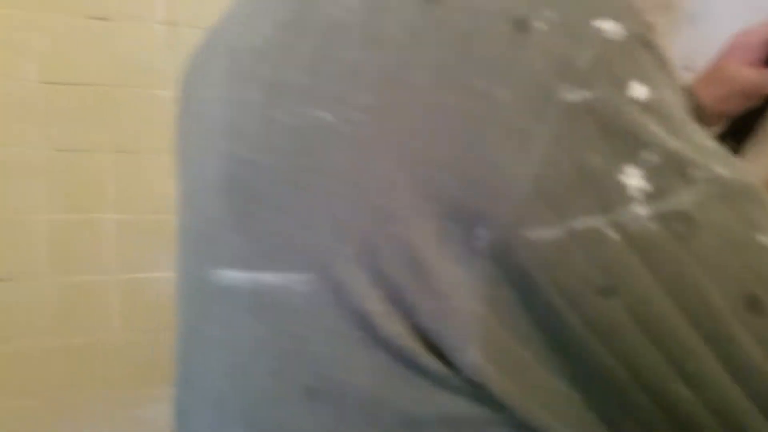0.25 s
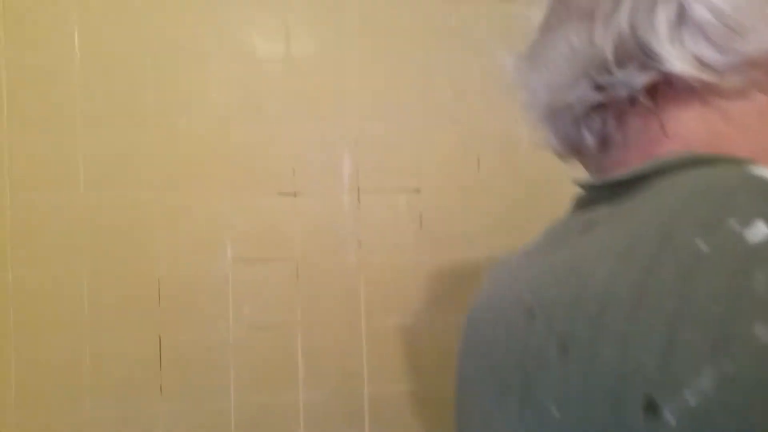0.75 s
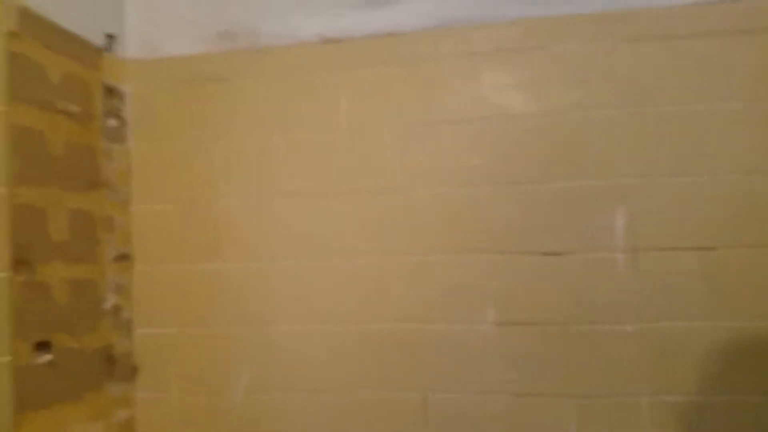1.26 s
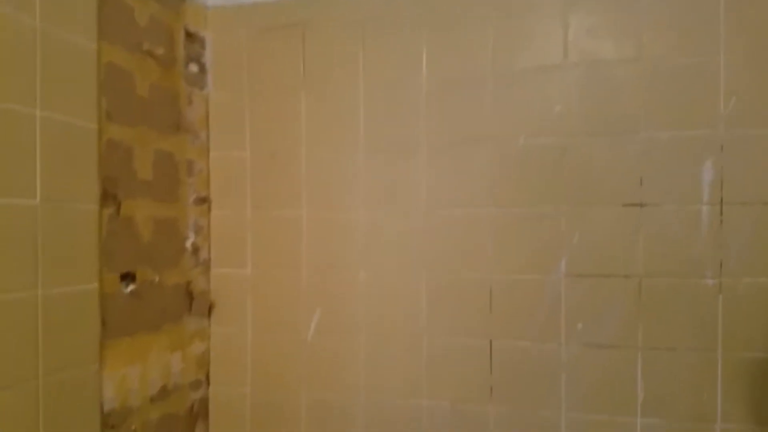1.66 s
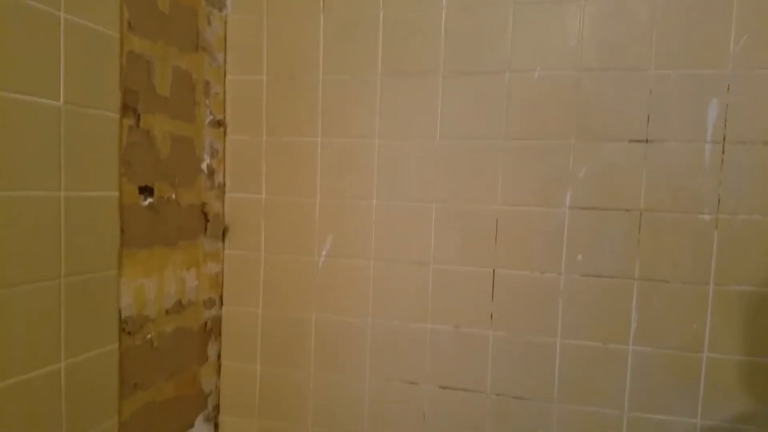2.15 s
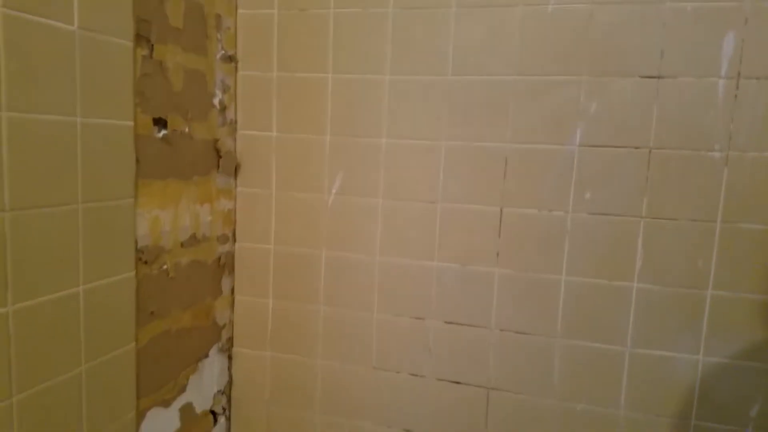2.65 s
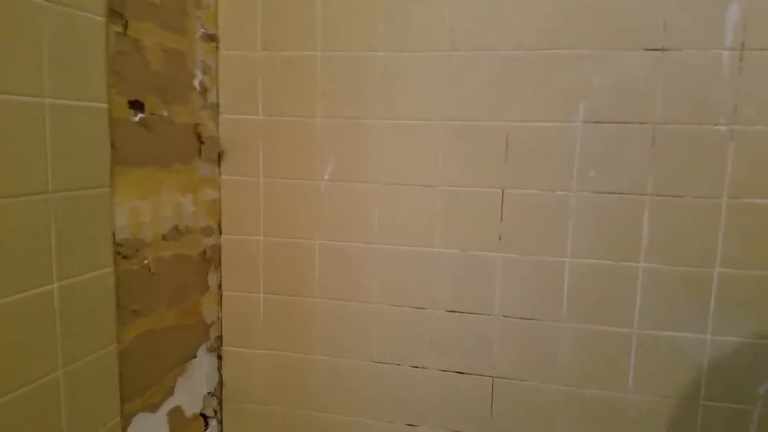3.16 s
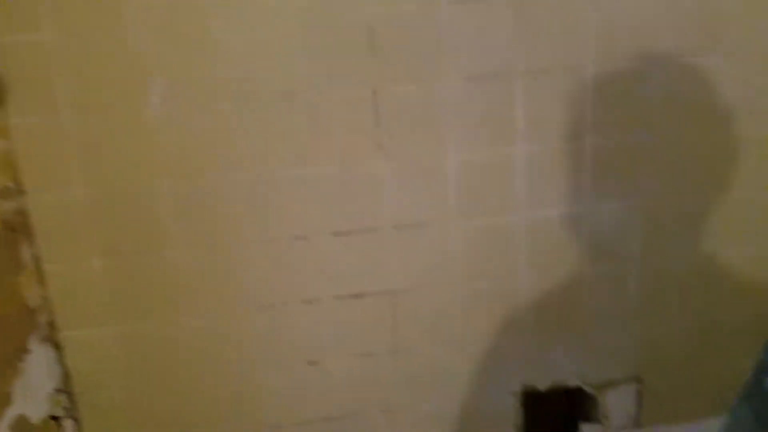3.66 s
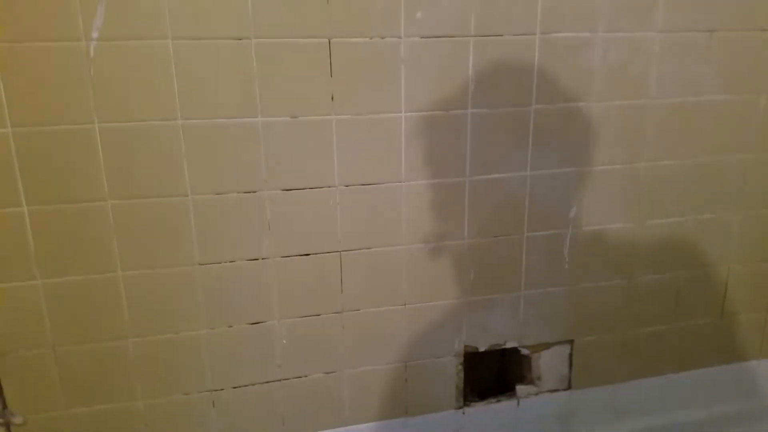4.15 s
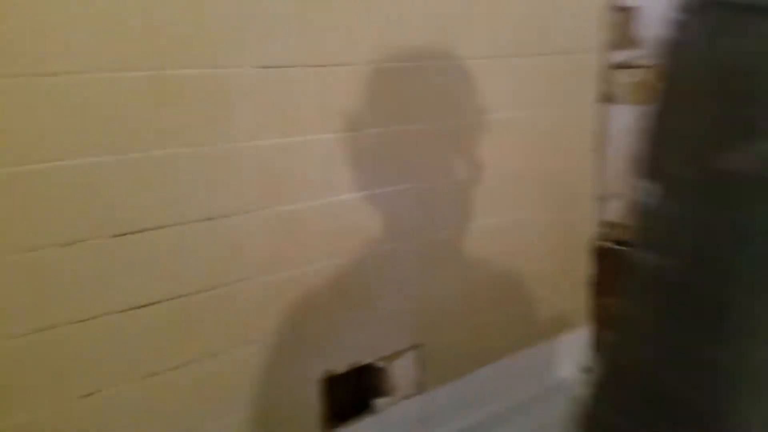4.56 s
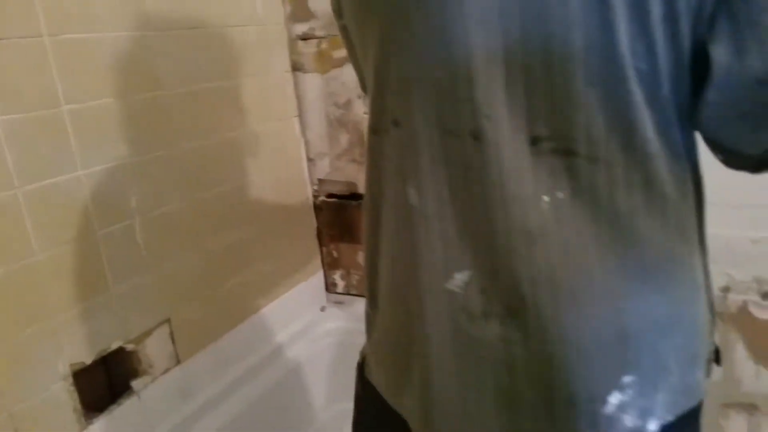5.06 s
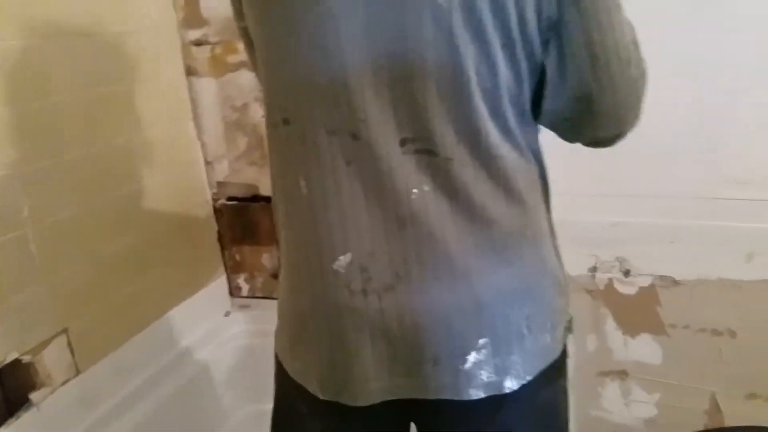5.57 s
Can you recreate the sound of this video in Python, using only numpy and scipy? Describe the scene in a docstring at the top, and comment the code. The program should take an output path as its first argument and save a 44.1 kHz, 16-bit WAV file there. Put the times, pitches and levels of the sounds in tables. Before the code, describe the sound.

Handheld stereo microphone close to tile removal. After soft thumps and a little grit come four quick bright clanks of steel with hollow wall knock and short echo. Scraping and rough plaster crunches follow, with brittle snaps and falling crumbs. The work eases, then a sheet of tiles drops with a sharp clattering impact, and loose pieces clink. Only faint debris, room air and light scraping remain.

```python
"""Knocking tiles off a bathroom wall

Four sharp blows fall on a steel bar, which then levers and scrapes behind the tiles while plaster cracks and
trickles, until a slab lets go and clatters down. Hits are short bursts of clicks and rubbing is a stream of clicks;
filters give them the ring of bar, tile and hollow wall, and fading noise gives the echo of a small, hard room.
Air, hum and hand rumble are filtered noise; the limiter of a hand-held camera flattens the loud hits."""
import sys
import numpy as np
from scipy import signal
from scipy.fft import rfft, irfft
from scipy.io import wavfile
from scipy.ndimage import uniform_filter1d

SR = 44100
rng = np.random.default_rng(int(sys.argv[2]) if len(sys.argv) > 2 else 0)


def put_to_file(sound):
    """Save the sound as 16-bit audio at rate SR, in the file named by the first command-line argument."""
    columns = np.atleast_2d(sound).T  # one column per channel
    safe = np.clip(columns, -1, 1)
    whole_steps = np.round(safe * 32767)
    wavfile.write(sys.argv[1], SR, whole_steps.astype(np.int16))


N = 256220
SIZE = 2 ** 15   # length of a short sound or echo, in samples
HZ = np.maximum(np.arange(SIZE // 2 + 1) * SR / SIZE, 1)   # frequencies at which filters are drawn

# Resonances of the hollow wall. Each row: frequency in Hz, width in Hz, lift in dB before scaling.
WALL_MODES = [(146.4, 13, 7.5), (212, 25, 8.5), (277, 66, 4.5), (305.5, 59, 1.5), (350.5, 7, 8),
              (490, 23, 0), (608, 53, -2), (677, 180, 4.5), (920, 91, 3)]
# Resonances of a tile on the wall. Each row: frequency in Hz, width in Hz, lift in dB before scaling.
TILE_MODES = [(1380, 60, 5.5), (1530, 83, 3), (1640, 66, 3.2), (1823, 59, 13), (2293, 320, 14),
              (2500, 110, 3.3), (3730, 240, 5.4), (5840, 190, 3.4)]
# The bar's edge dragging in the gap. Each row: frequency in Hz, width in Hz, lift in dB before scaling.
GRINDING_MODES = [(404, 46, 4), (705, 170, 2), (1300, 230, 3.5), (2000, 210, 3.5)]
# Basic tone of small brittle breaks. Each row: frequency in Hz, relative level in dB per Hz.
BRITTLE_COLOUR = [(40, -18), (200, -0.5), (600, -1.5), (1500, -1.5), (3500, -3.5), (7000, -7.5),
                  (11000, -7.5), (16000, -9.5)]
# Tile chips and grout snapping. Each row: start in seconds, relative level in dB, treble in dB against the middle.
SNAPS = [(0.001, -36.5, -15.5), (0.335, -40, -8), (1.555, -48.5, 3), (1.736, -41.5, -3), (1.838, -47, 5),
         (2.911, -48, 6), (3.12, -37, 2.5), (3.238, -38, -8), (3.369, -47.5, 3.5), (3.427, -48, 8),
         (3.458, -53.5, 15), (3.582, -39, 1), (3.804, -51, 9), (3.938, -48, -12), (5.205, -60.5, -1),
         (5.456, -52.5, 2.5), (5.572, -56, 1), (5.742, -58, 11.5)]


def from_db(db):
    """Turn decibels into a factor."""
    return 10 ** (np.asarray(db) / 20)


def rms_one(x):
    """Scale a sound to an average (rms) level of 1."""
    return x / np.sqrt(np.mean(x ** 2) + 1e-20)


def at_hz(points, hz=HZ, axis=1):
    """A column of a table, joined by straight lines over log frequency."""
    points = np.array(points)
    return np.interp(np.log(hz), np.log(points[:, 0]), points[:, axis])


def lift(modes):
    """The dB that a set of resonances adds to a spectrum: one rounded peak for each."""
    return sum(db / (1 + (2 * (HZ - hz) / width) ** 2) for hz, width, db in modes)


def shelf(corner_hz):
    """A smooth step over frequency: 0 well below the corner, 1 well above."""
    return HZ ** 4 / (HZ ** 4 + corner_hz ** 4)


def plate(lowest_hz):
    """The dB that a free piece of tile, ringing as a plate, adds to a spectrum."""
    # Modes of the plate. Each row: multiple of its lowest mode, width in Hz, lift in dB before scaling.
    plate_modes = [(1, 160, 11), (1.56, 200, 10.5), (2.57, 220, 12), (3.25, 200, 7), (4.4, 305, 5.5),
                   (5.05, 300, 6)]
    return lift([(multiple * lowest_hz, width, lift_db) for multiple, width, lift_db in plate_modes])


def coloured(x, db):
    """Filter with the given gain at each frequency, which never sounds ahead of its input (minimum phase)."""
    cepstrum = irfft(np.log(from_db(db)))
    # folding the second half onto the first makes the filter minimum-phase
    cepstrum[1:SIZE // 2] *= 2
    cepstrum[SIZE // 2 + 1:] = 0
    response = irfft(np.exp(rfft(cepstrum)))[None, :SIZE // 2]
    return signal.fftconvolve(x, response, axes=1)[:, :x.shape[1]]


def grains(count, per_s, spread_db):
    """Clicks at random moments, of uneven size and either sign."""
    sizes = from_db(spread_db * np.minimum(rng.exponential(1, count), 4))
    signs = rng.choice([-1, 1], count)
    return sizes * signs * (rng.random(count) < per_s / SR)


def bathroom(direct_db, lag_s, build_s=0.00042):
    """Stereo echo of one spot: direct sound, a few wall slaps, then a dense tail dying at its own rate per octave."""
    # Each row: frequency in Hz, time to die by 60 dB in seconds, left-right likeness (1 alike, 0 unrelated).
    room = [(40, 0.12, 0), (150, 0.38, 1), (350, 0.34, .94), (700, 0.38, .55), (1400, 0.37, 0),
            (3020, 0.26, 0), (6800, 0.31, 0.1), (15000, 0.2, 0)]
    t = np.arange(SIZE) / SR
    white = rfft(rng.standard_normal((2, SIZE)))
    alike = np.clip(at_hz(room, axis=2), -.99, .99)
    ears = np.sqrt(1 + alike) * white[0] + np.sqrt(1 - alike) * white[1] * [[1], [-1]]

    centres = 2. ** np.arange(5, 15)   # octaves in Hz
    tail = 0
    for hz, share in zip(centres, np.eye(len(centres))):
        band = irfft(ears * np.interp(np.log(HZ), np.log(centres), share))
        tail = tail + band * np.exp(-np.log(1000) * t / at_hz(room, hz))
    tail *= 1 - np.exp(-t / build_s)
    tail /= np.sqrt(np.sum(tail ** 2) / 2)

    # the direct sound reaches the left channel later by lag_s
    for channel, delay in enumerate([round(lag_s * SR), 0]):
        tail[channel, delay] += from_db(direct_db)
        slaps = (rng.uniform(.002, .02, 5) * SR).astype(int)
        tail[channel, slaps] += from_db(direct_db - 7.0)
    return tail


def add(out, s, sound):
    """Lay a short sound into the scene at time s."""
    start = max(round(s * SR), 0)
    out[:, start:start + SIZE] += sound[:, :min(SIZE, N - start)]


def swells(rows, attack_s, release_s):
    """Level in dB of sounds that rise, hold from time s and fall; attack and release are times for 20 dB."""
    t = np.arange(N) / SR
    level = np.full(N, -120.)
    for s, held_s, db in rows:
        away = np.maximum((s - t) / attack_s, (t - s - held_s) / release_s)
        level = np.maximum(level, db - 20 * np.maximum(away, 0))
    return level


def together(*levels_db):
    """Level in dB of several unrelated sounds at once: their powers add."""
    return 10 * np.log10(sum(from_db(db) ** 2 for db in levels_db))


def ring(hz, t60):
    """One struck mode: a sine that dies by 60 dB in t60 seconds."""
    t = np.arange(SIZE) / SR
    return np.sin(2 * np.pi * hz * t) * np.exp(-np.log(1000) * t / t60)


def contact(body_db, crumble_s, crumble_db, direct_db, lag_s):
    """A crack and a dying shower of smaller fractures, coloured by the struck body and spread by the room."""
    t = np.arange(SIZE // 8) / SR
    shower = grains(len(t), 4000, 4) * np.exp(-t / crumble_s)
    force = from_db(crumble_db) * shower / np.sqrt(np.sum(shower ** 2) + 1e-9)
    force[0] += 1   # the first crack
    force /= np.sqrt(np.sum(force ** 2))
    in_room = signal.fftconvolve(bathroom(direct_db, lag_s), force[None], axes=1)[:, :SIZE]
    return coloured(in_room, body_db)


def friction(level_db, spectrum, per_s, spread_db):
    """A stream of tiny slips that follows the given level, catching unevenly, heard through the room."""
    catches_per_s, catch_db = 61, 2.5   # random changes of strength per second, and their typical size
    turns = np.arange(N) / SR * catches_per_s
    catch = np.interp(turns, np.arange(1024), rng.standard_normal(1024))
    clicks = grains(N, per_s, spread_db)[None] * from_db(catch_db * catch)
    slips = rms_one(coloured(clicks, spectrum))
    return signal.fftconvolve(slips * from_db(level_db), bathroom(-14.5, .0002), axes=1)[:, :N]


def stereo_noise(spectrum, side_db):
    """Steady coloured noise, rms 1; side_db sets how much the two channels differ."""
    mid, side = rng.standard_normal((2, N + SIZE))
    both = mid + from_db(side_db) * side * [[1], [-1]]
    return rms_one(coloured(both, spectrum)[:, SIZE:])   # skip the filter's start


def background(air_db=-70, rumble_db=2, hum_hz=133, hum_width_hz=14):
    """Still air, the rumble of the hand swinging the camera and a wavering hum, all made of filtered noise."""
    # Tone of the air. Each row: frequency in Hz, relative level in dB per Hz.
    air_colour = [(20, -25.5), (40, -14), (130, -8.5), (220, -5.5), (380, -3.5), (700, -10.5), (1500, -18),
                  (4000, -13), (7000, -26), (16000, -23)]
    # Tone of the hand rumble. Each row: frequency in Hz, relative level in dB per Hz.
    rumble_colour = [(8, -5), (25, 2.5), (70, -6.5), (200, -23), (1000, -69.5)]
    # Swings of the camera. Each row: start of the hold in seconds, held time in seconds, relative level in dB.
    swings = [(0, 0.04, -33.5), (0.33, 1.05, -45.5), (2.5, 1.7, -64.5), (4.22, .45, -69),
              (5.15, 0.16, -55.5), (5.5, 0.26, -67)]
    # A low hum comes and goes. Each row: start of the hold in seconds, held time in seconds.
    hums = [(3.15, 1.45), (5.419, .39)]
    steady_hand_db, hum_level_db = -84.5, -59   # the hand's level is raised by rumble_db below

    hand_db = together(steady_hand_db, swells(swings, attack_s=.12, release_s=0.16))
    hum_db = swells([(s, held_s, hum_level_db) for s, held_s in hums], attack_s=0.59, release_s=0.43)
    hum_colour = -20 * np.log10(1 + ((HZ - hum_hz) / hum_width_hz) ** 2)

    air = from_db(air_db) * stereo_noise(at_hz(air_colour), side_db=-3.5)
    rumble = from_db(hand_db + rumble_db) * stereo_noise(at_hz(rumble_colour), side_db=-16.5)
    hum = from_db(hum_db) * stereo_noise(hum_colour, side_db=-14.5)
    return air + rumble * from_db([[-2], [2]]) + hum   # rumble is louder on the right


def chips(gain_db=37, crumble_s=0.0021, tile=0.39):
    """Small brittle snaps of grout and glaze, which ring the tile a little."""
    out = np.zeros((2, N))
    for s, db, treble_db in SNAPS:
        body = at_hz(BRITTLE_COLOUR) + tile * lift(TILE_MODES) + treble_db * shelf(4800)
        add(out, s, contact(gain_db + db + body, crumble_s, crumble_db=3, direct_db=-5, lag_s=.0001))
    return out


def knocks(gain_db=37, soft_db=-10):
    """Soft, heavy contacts with wall and floor reach mostly the low modes of the wall."""
    # Dull knocks. Each row: start in seconds, relative level in dB, hardness in dB (higher is brighter).
    knock_hits = [(0.001, -18.5, -14.5), (0.021, -29, -1.5), (0.322, -27, -2), (0.336, -19, -15),
                  (0.372, -29, -23), (3.008, -39, -16), (3.553, -39.5, -10.5), (4.386, -14.5, -0.5),
                  (5.079, -38, -32.5), (5.565, -39, -18)]
    # Tone of a knock. Each row: frequency in Hz, relative level in dB per Hz.
    knock_colour = [(25, -17), (70, -3), (140, 6), (280, -3.5), (500, -1.5), (1000, -16.5), (2200, -15.5),
                    (5000, -48.5), (16000, -52.5)]
    out = np.zeros((2, N))
    for s, db, hard_db in knock_hits:
        body = at_hz(knock_colour) + 1.19 * lift(WALL_MODES)
        body += (hard_db - soft_db) * (shelf(390) - .3)
        add(out, s, contact(gain_db + db + body, crumble_s=0.014, crumble_db=-1.5, direct_db=-11.0, lag_s=.0001))
    return out


def levering(groan_gain_db=-1, scrape_gain_db=2, grit_gain_db=1, rest_db=-74, strain_db=-3, dust_db=-4, slide_db=-7):
    """The bar grinds along the plaster, the board behind it groans, and loosened grit trickles down.

    Effort drives all three; heaves add to the groan, spills and snaps to the grit, and falling grit scrapes the wall."""
    # How hard the bar is worked, in two spells. Each row: time in seconds, relative scraping level in dB.
    effort_spells = [
        [(1.5, -65), (1.98, -65.5), (2.12, -53), (2.22, -54.5), (2.52, -51.5), (2.84, -51), (3.05, -54.5),
         (3.35, -63), (4.2, -63.5), (4.35, -67.5)],
        [(5.4, -65), (5.686, -71.5), (5.8, -59)],
    ]
    # The board groans at each heave. Each row: start of the hold in seconds, held time in seconds, relative level in dB.
    heaves = [(1.765, 0.0091, -44.5), (2.11, 0.022, -41.5), (2.305, 0.031, -32.5), (2.51, 0.076, -39.5),
              (2.87, 0.026, -44.5), (2.995, 0.0067, -36)]
    # Grit pours out. Each row: start of the hold in seconds, held time in seconds, relative level in dB.
    spills = [(0.22, 0.14, -52), (1.66, 0.14, -49.5), (2.22, 0.14, -51.5), (2.73, 0.063, -37),
              (3.0, 0.028, -42.5), (4.02, .12, -62), (5.12, 0.049, -59)]
    # Tones of groan, scrape and grit. Each row: frequency in Hz, relative level in dB per Hz.
    groan_colour = [(50, -23), (110, -10.5), (170, -4.5), (280, -5.5), (400, 0.5), (650, -4), (1000, -8),
                    (2500, -16.5), (16000, -57)]
    scrape_colour = [(100, -18), (300, 2.5), (800, -3), (1400, 0), (2500, 1.5), (4200, -4.5), (6000, -18),
                     (16000, -35)]
    grit_colour = [(300, -10), (1500, 3.5), (3500, 5), (6500, 0.5), (11000, 4.5), (16000, 6.5)]

    t = np.arange(N) / SR
    spells_db = []
    for spell in effort_spells:
        s, db = np.transpose(spell)
        spells_db.append(np.interp(t, s, db, -120, -120))
    effort_db = together(rest_db, *spells_db)

    # every snap sheds a little grit, which trickles away
    shed_db, shed_hold_s, shed_fade_s = -16.5, 0.044, .35
    shed = [(s + shed_hold_s, shed_hold_s, db + treble_db + shed_db) for s, db, treble_db in SNAPS]
    spill_db = swells(spills, attack_s=0.17, release_s=0.18)
    falling_db = together(spill_db, swells(shed, shed_hold_s, shed_fade_s))

    groan_db = together(effort_db + strain_db, swells(heaves, attack_s=0.1, release_s=0.047))
    scrape_db = together(effort_db, falling_db + slide_db)
    grit_db = together(effort_db + dust_db, falling_db)

    board = at_hz(groan_colour) + 0.77 * lift(WALL_MODES)
    edge = at_hz(scrape_colour) + lift(GRINDING_MODES)
    groan = friction(groan_db + groan_gain_db, board, per_s=900, spread_db=2.5)
    scrape = friction(scrape_db + scrape_gain_db, edge, per_s=630, spread_db=5)
    grit = friction(grit_db + grit_gain_db, at_hz(grit_colour), per_s=990, spread_db=6.5)
    return groan + scrape + grit


def crunches(gain_db=33, grinding=0.92, bass_db=-7):
    """Plaster gives way gradually under the bar's edge: nearly all shower, hardly any first crack."""
    # Each row: start in seconds, relative level in dB, treble in dB against the middle, crumbling time in seconds.
    crushed = [(0.255, -35.5, -20, 0.029), (2.05, -38, -2.5, 0.024), (2.318, -27, -15.5, 0.013),
               (2.585, -24.5, -16.5, 0.034), (2.737, -30.5, -10, 0.021), (2.981, -31.5, -4, 0.012)]
    out = np.zeros((2, N))
    for s, db, treble_db, crumble_s in crushed:
        body = at_hz(BRITTLE_COLOUR) + 0.27 * lift(TILE_MODES) + grinding * lift(GRINDING_MODES)
        body += bass_db * (1 - shelf(1000)) + treble_db * shelf(4500)
        add(out, s, contact(gain_db + db + body, crumble_s, crumble_db=17, direct_db=-6.5, lag_s=.0001))
    return out


def blows(gain_db=43):
    """Each blow rings the bar, the tile under its edge and the hollow wall; the bar sings on."""
    # Each row: start in seconds, relative level in dB, wall boom in dB, treble in dB,
    # share of bar ring (0 to 1), share of tile ring (0 to 1).
    bar_hits = [(0.487, -5, -2.5, 2, 0.97, 0.16), (0.7702, -7.5, 1, -2, 0.87, 0.86),
                (1.0455, -10, 0.5, 5, 0.2, 0.68), (1.3027, -9.5, -3.5, 3.5, 0.4, 0.5)]
    # Tone of a blow. Each row: frequency in Hz, relative level in dB per Hz.
    blow_colour = [(25, -23.5), (70, -16.5), (130, -6.5), (260, -3.5), (450, -5.5), (1000, -12),
                   (2400, -15.5), (4000, -15), (6000, -23.5), (9000, -23), (12500, -16.5), (16000, -24)]
    # Resonances of the bar. Each row: frequency in Hz, width in Hz, lift in dB before scaling.
    bar_modes = [(2540, 400, 7.8), (2854, 170, 7.6), (5076, 110, 4.5), (6330, 240, 15), (7300, 49, 5),
                 (7600, 110, 3.1), (8850, 170, 9.9), (10870, 150, 15), (11680, 150, 4), (14230, 250, 8)]
    # Modes on which the bar sings on. Each row: frequency in Hz, time to die by 60 dB in seconds.
    singing = [(7180, .8), (10960, .5)]
    # Level of each singing mode in dB, before the blow's own level is added.
    singing_db = [-39.5, -31]
    # Power with which each singing mode follows the share of bar ring (0: not at all).
    singing_follows = [2, 0]
    out = np.zeros((2, N))
    for s, db, boom_db, treble_db, bar, tile in bar_hits:
        body = at_hz(blow_colour) + lift(WALL_MODES) + bar * lift(bar_modes) + tile * lift(TILE_MODES)
        body += boom_db * (1 - shelf(980)) + treble_db * shelf(4000)
        add(out, s, contact(gain_db + db + body, crumble_s=0.027, crumble_db=-2, direct_db=-8.5, lag_s=0.00034))
        for (hz, t60), steel_db, power in zip(singing, singing_db, singing_follows):
            add(out, s, from_db(steel_db + db) * bar ** power * ring(hz, t60)[None])
    return out


def clinks(gain_db=29):
    """Loose pieces touch with a tick, ring as small plates and bounce once."""
    # Each row: start in seconds, relative level in dB, lowest mode in Hz, treble in dB.
    touches = [(1.004, -35.5, 4360, -2), (2.593, -36.5, 4040, -12), (3.069, -49, 2280, -8),
               (3.124, -49, 2310, -9), (3.702, -51, 2340, 12.5), (4.21, -53.5, 2350, -6),
               (4.264, -48.5, 2300, -5), (4.668, -42, 1650, -24), (4.693, -34.5, 1675, -22),
               (4.789, -48.5, 1688, -16)]
    bounce_s, bounce_db = 0.046, -10.5   # delay and level of the second touch
    out = np.zeros((2, N))
    for s, db, lowest_hz, treble_db in touches:
        body = at_hz(BRITTLE_COLOUR) + plate(lowest_hz) + treble_db * shelf(3600)
        touch = contact(gain_db + db + body, crumble_s=0.0015, crumble_db=-1.0, direct_db=-2, lag_s=.0001)
        add(out, s, touch)
        add(out, s + bounce_s, from_db(bounce_db) * touch)
    return out


def slab(gain_db=41, loose_hz=2340, bonded=0.45):
    """A sheet of tiles breaks free, lands and bounces; a tile that comes loose from it rings as a plate."""
    # Each row: start in seconds, relative level in dB, boom in dB, treble in dB,
    # plate ring before scaling (about 0 to 1), crumbling time in seconds.
    slab_hits = [(4.363, -25, -6.5, 2, 0.1, 0.025), (4.373, -27.5, -7, 0.5, 0, 0.012),
                 (4.3921, -3.5, -0.5, -2.5, 0.1, 0.0027), (4.4025, -2.5, -3, -6, .15, 0.0036),
                 (4.4131, -10, 12, -5, 0, .004), (4.4476, -8, -10, 7, 0.8, 0.0013),
                 (4.4542, -13, -12, 4, 1, .002), (4.4619, -14.5, -16.5, 0, 1.02, 0.003),
                 (4.493, -10, -17, -0.5, 0.36, 0.0034), (4.511, -18.5, -12, -0.5, 0.4, 0.0039)]
    # Tone of the slab. Each row: frequency in Hz, relative level in dB per Hz.
    slab_colour = [(25, -29.5), (90, -27.5), (190, -17), (320, -4.5), (480, -13.5), (900, -15.5),
                   (1800, -12.5), (3500, -17), (5500, -21.5), (8500, -30.5), (11000, -25), (16000, -30)]
    out = np.zeros((2, N))
    for s, db, boom_db, treble_db, ringing, crumble_s in slab_hits:
        # plaster on the tile's back damps its upper modes
        piece = 1.3 * ringing * plate(loose_hz) * (1 - shelf(4800))
        hollow = .55 * lift(WALL_MODES)
        body = at_hz(slab_colour) + hollow + bonded * lift(TILE_MODES) + piece
        body += boom_db * (1 - shelf(1100)) + treble_db * shelf(4900)
        # a slow break puts more into the shower than into the crack
        crumble_db = 10 * np.log10(crumble_s / 0.0026)
        add(out, s, contact(gain_db + db + body, crumble_s, crumble_db, direct_db=-3, lag_s=.0001))
    return out


def scene():
    """All sounds together; the slab is a little louder on the right."""
    debris = chips() + crunches() + clinks()
    falling_slab = slab() * from_db([[-.8], [.8]])
    return background() + debris + knocks() + levering() + blows() + falling_slab


def record(dry, limit_db=-12, slope=0.35, release_db_per_s=150, sense_s=.004):
    """The limiter turns loud hits down and recovers gradually; peaks are rounded and the top is cut."""
    power = uniform_filter1d(np.mean(dry ** 2, axis=0), int(sense_s * SR))
    over = np.maximum(10 * np.log10(np.abs(power) + 1e-12) - limit_db, 0)
    # the excess over the limit may fall only at the release rate; slope is the part of it that is taken off
    fall = release_db_per_s * np.arange(N) / SR
    held = uniform_filter1d(np.maximum.accumulate(over + fall) - fall, size=64)
    limited = 1.292 * np.tanh(dry * from_db(-slope * held) / 1.359)
    top_cut = signal.ellip(10, .2, 70, 15900, fs=SR, output="sos")   # removes sound above 15900 Hz
    return signal.sosfilt(top_cut, limited)


dry = scene()
out = record(dry)
put_to_file(out)
```